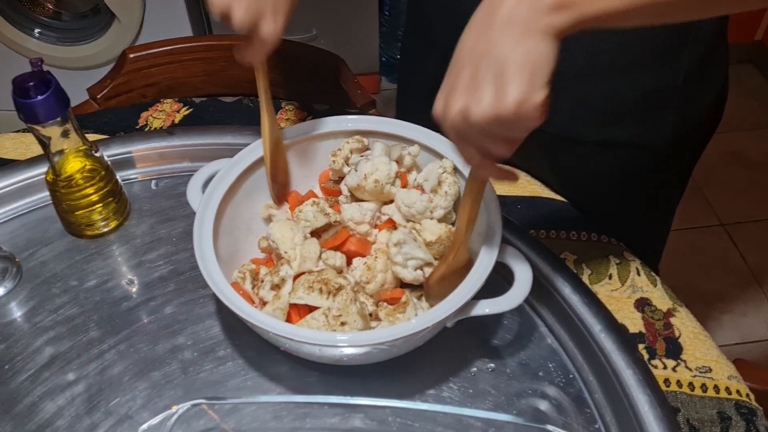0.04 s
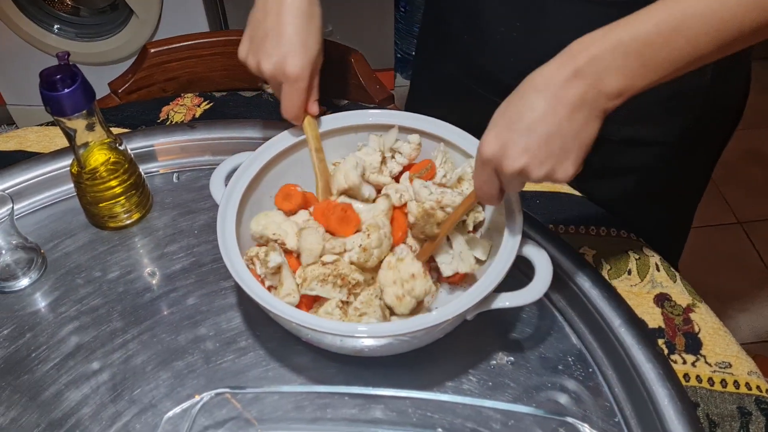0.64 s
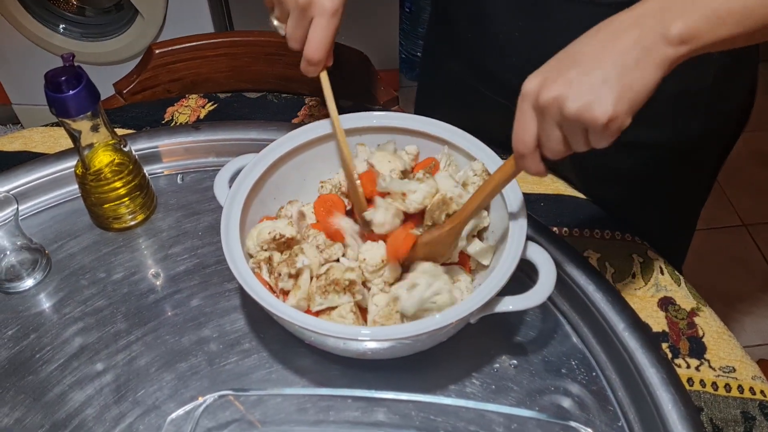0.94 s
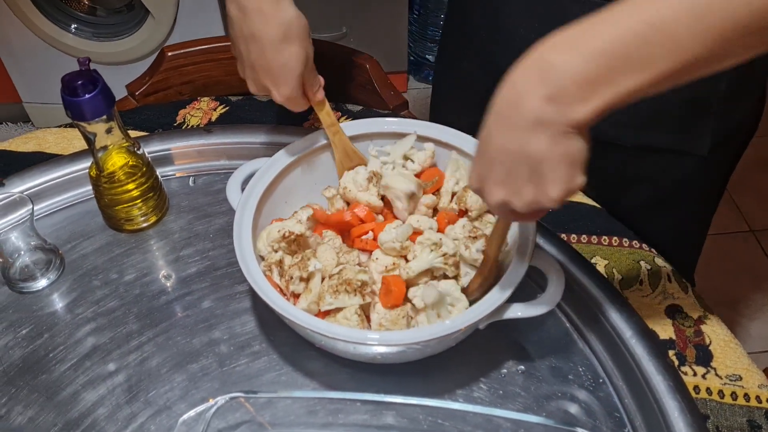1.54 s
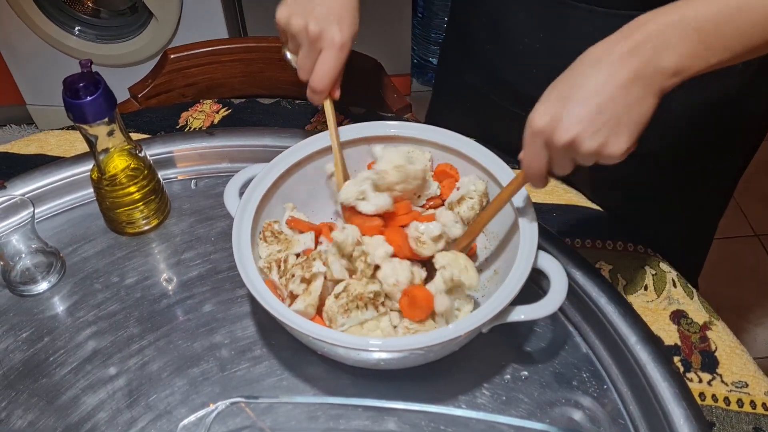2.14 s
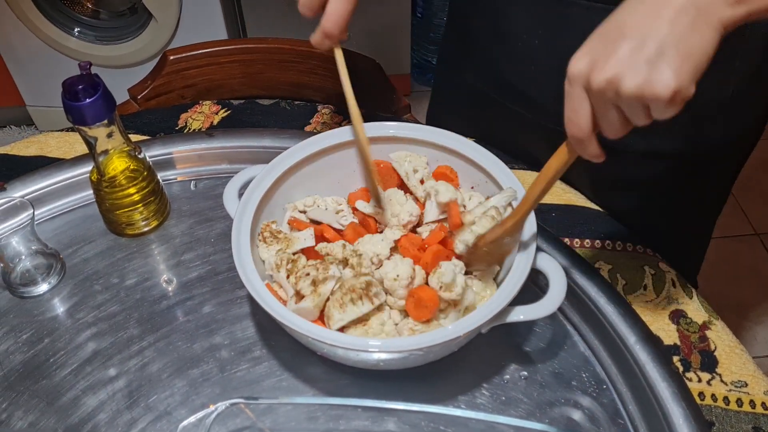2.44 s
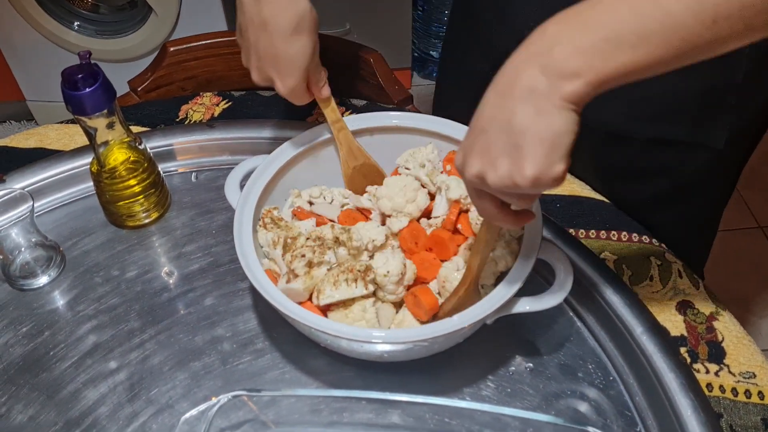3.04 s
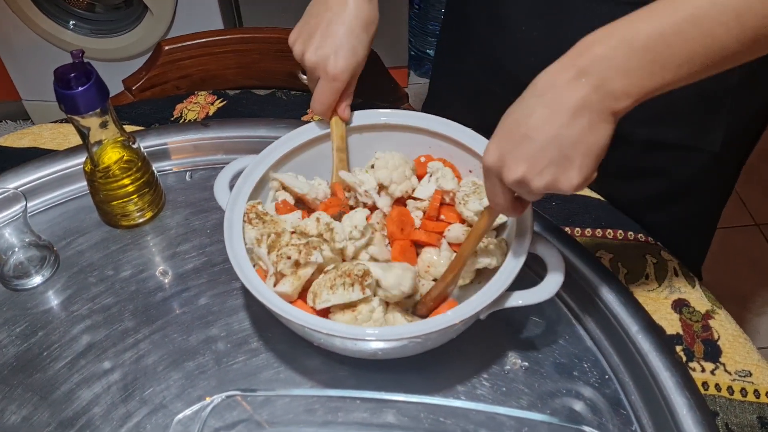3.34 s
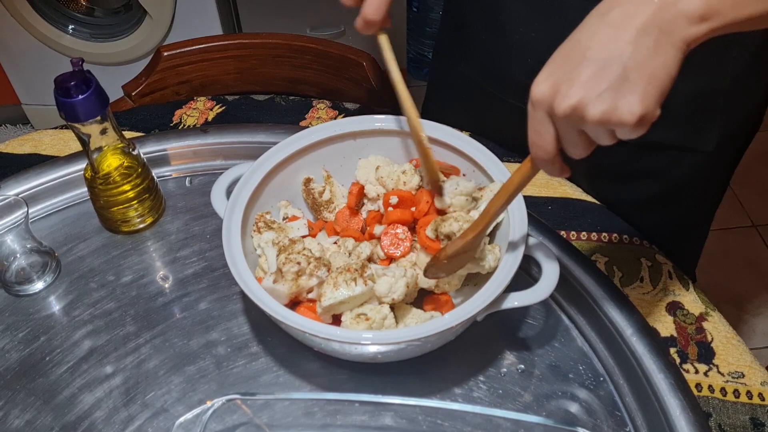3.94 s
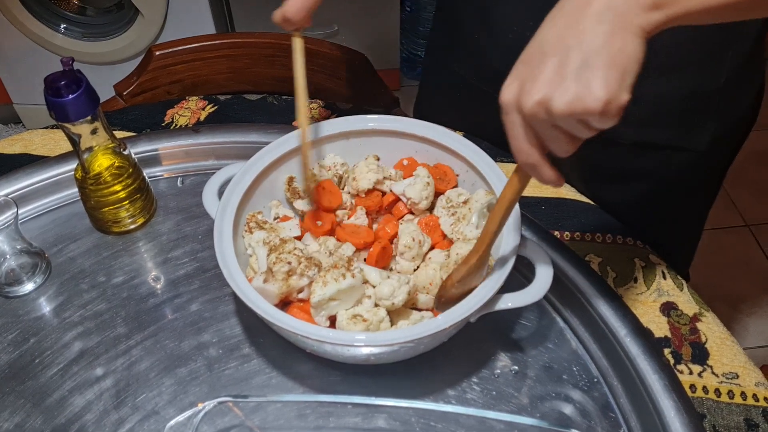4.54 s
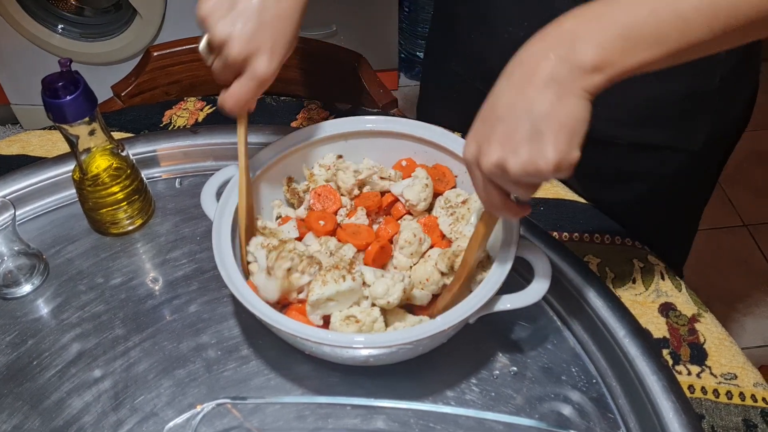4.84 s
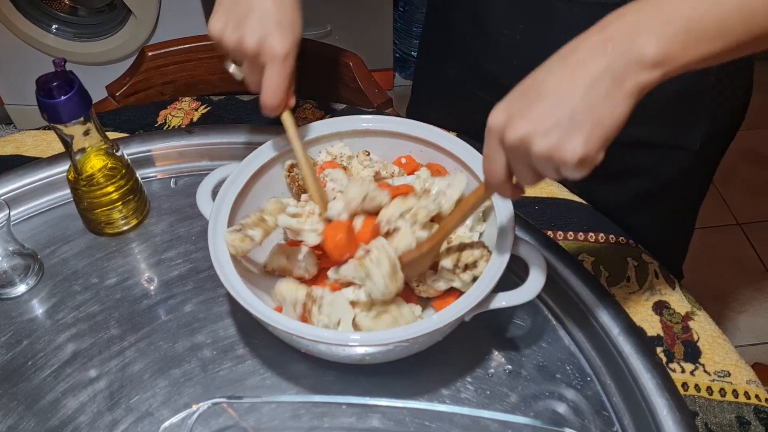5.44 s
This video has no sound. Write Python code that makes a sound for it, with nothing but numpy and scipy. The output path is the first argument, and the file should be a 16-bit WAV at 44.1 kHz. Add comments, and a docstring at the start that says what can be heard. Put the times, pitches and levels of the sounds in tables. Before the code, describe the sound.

Two wooden spoons toss moist vegetables in a plastic bowl, with irregular clacks, short scrapes and soft wet rustling in a small kitchen.

```python
"""Two wooden spoons toss cauliflower and carrot slices in a plastic bowl on a big steel tray.
Each scoop is a clack that rings spoon and bowl, and a stick-slip scrape down the wall.
The moist pieces tick as they unstick, rustle as they rub and tumble softly over one another.
The tray thumps under the knocks and drones as the bowl shifts on it.
A small kitchen answers with a short tail, over low room tone and a faint hum."""
import sys
import numpy as np
from scipy import signal
from scipy.fft import rfft, irfft
from scipy.io import wavfile
from scipy.ndimage import uniform_filter1d

SR = 44100
rng = np.random.default_rng(int(sys.argv[2]) if len(sys.argv) > 2 else 0)


def wav_record(signal):
    """Record a signal, one row per channel, as 16-bit PCM in the file named by sys.argv[1]."""
    frames = np.transpose(np.atleast_2d(signal))
    bounded = np.clip(frames, -1, 1)
    # unit amplitude maps onto the largest positive 16-bit level
    quanta = np.round(bounded * 32767).astype(np.int16)
    wavfile.write(sys.argv[1], SR, quanta)


N = 250870
TIME = np.arange(N) / SR

# spoon hits: (time [s], strength [dB], hardness [0 = cushioned by vegetables, 1 = tip on the bare wall],
# pitch favoured by the struck spot [Hz])
SPOON_HITS = [(.0005, -36, 0.56, 1220), (0.0766, -34, 0.48, 1340), (0.0999, -39, 0.53, 1340),
              (.174, -35.5, 0.76, 1440), (.1827, -47.5, 0.86, 1570), (.351, -42, 0.45, 2000),
              (0.3668, -34, 0.32, 1130), (0.4185, -34, 0.14, 1190), (0.4282, -36.5, 0.031, 1040),
              (0.4948, -30, 0.42, 1410), (.5032, -31, 0.29, 1050), (1.2725, -33, 0.57, 1500),
              (1.3616, -24.5, 0.63, 1430), (1.4772, -49, 0.97, 1090), (1.6725, -47, 0.047, 1050),
              (1.7, -29.5, 0.48, 1210), (1.8594, -42, 0.1, 1010), (2.5469, -39, 0.59, 1470),
              (2.7105, -28, 0.75, 1700), (2.9529, -44.5, .95, 1680), (3.162, -29, 0.22, 1060),
              (3.1925, -32, 0.23, 1250), (3.274, -39.5, .04, 980), (4.583, -37, 0.57, 1370),
              (4.815, -39.5, 0.79, 1960), (5.0524, -54.5, 0.11, 1260), (5.0684, -45, 0.18, 1950)]
# the ring of spoon and bowl: (pitch [Hz], level [dB], t60 [s])
BOWL_MODES = [(690.4, -9.5, 0.067), (760, -9, 0.019), (1043, -11.5, 0.021), (1090, -7, 0.036),
              (1496, -7, 0.02), (1703, 5, 0.0052), (2073, -13.5, 0.019), (3260, -9.5, 0.01),
              (4020, -1.5, 0.0051), (4906, -8, 0.011), (6550, -12, 0.0027), (7440, -8, 0.0085),
              (11800, -27.5, 0.0035)]
# a knock's body, clack, crack, snap and tip registers: (low edge [Hz], high edge [Hz])
REGISTER_BANDS = [(600, 880), (880, 2300), (2600, 5700), (5700, 8300), (8300, 14000)]


def knocks(contact_db=2, detune=0.025, uneven_db=6.5, spot_db=5, spot_octaves=0.17):
    """A brief contact rings spoon and bowl. Returns the close sound and the reverb send."""
    t, out = np.arange(SR // 8) / SR, np.zeros((4, N))
    hz, db, t60 = np.transpose(BOWL_MODES)[:, :, None]
    attack, contact_s = round(.008 * SR), .0009
    for start, strength_db, hardness, spot_hz in SPOON_HITS:
        shift, weight = rng.standard_normal((2, len(hz), 1))  # no two hits ring alike
        favour_db = spot_db * np.exp(-(np.log2(hz / spot_hz) / spot_octaves) ** 2)
        decay = amp(db + favour_db + uneven_db * weight - 60 * t / t60)
        ring = decay * np.sin(2 * np.pi * hz * (1 + detune * shift) * t)
        contact = amp(contact_db) * np.exp(-t / contact_s) * diffuse(len(t), direct=0.17)
        blow = ring.sum(0) + contact
        paths = np.vstack([bounces(blow), blow])  # close pair, send pair
        for band, band_db in zip(REGISTER_BANDS, register_levels(strength_db, hardness)):
            part = signal.sosfilt(signal.butter(3, band, "band", fs=SR, output="sos"), paths)
            attack_rms = np.sqrt(np.mean(part[:, :attack] ** 2, axis=1, keepdims=True))
            add(out, start, amp(band_db) * part / attack_rms)
    return np.split(out, 2)


# a knock's tone, one row per register: (cushioned level [dB], bare-wall level [dB])
REGISTER_BALANCE = [(3.5, -30.5), (1.5, -2.5), (-18.5, 3), (-35.5, 3.5), (-48.5, -1)]


def register_levels(strength_db, hardness):
    """Level in dB of each register: a harder blow trades hollow body for crack."""
    cushioned, bare = np.transpose(REGISTER_BALANCE)
    return strength_db + cushioned + np.clip(hardness, 0, 1) * (bare - cushioned)


# slides down the wall: (start [s], end [s], squeak level [dB], glide from [Hz], to [Hz], rasp level [dB])
SPOON_SLIDES = [(.01, 0.075, -53.5, 1100, 1020, -56.5), (0.086, 0.181, -51.5, 1130, 940, -48),
                (.378, 0.439, -53.5, 1590, 1300, -48), (0.409, 0.47, -44.5, 700, 690, -66),
                (0.516, 0.671, -65, 1020, 750, -56.5), (1.375, 1.42, -72, 1770, 2200, -46.5),
                (1.412, 1.487, -46.5, 1560, 1040, -49), (1.731, 1.81, -62, 1650, 2100, -68),
                (1.777, 1.859, -48, 1020, 940, -51), (2.631, 2.73, -62, 1080, 1100, -58.5),
                (2.728, 2.807, -77, 1650, 1600, -49), (2.787, 2.861, -49.5, 1600, 1350, -46.5),
                (3.207, 3.281, -72, 1780, 1300, -54.5), (3.276, 3.331, -46.5, 960, 1040, -50.5),
                (4.22, 4.346, -73.5, 1300, 2050, -81), (4.618, 4.731, -58.5, 1080, 900, -59.5),
                (5.077, 5.276, -70, 736, 1900, -61.5), (5.162, 5.208, -53.5, 1730, 1560, -68)]
# EQ of wood rasping on plastic: (frequency [Hz], gain [dB])
RASP_EQ = [(300, -5), (700, 2.5), (1100, 1), (2100, 4), (2700, -2), (3600, 1.5), (5100, -2.5), (6500, -7),
           (7800, -7.5), (9500, -16.5), (12300, -11), (16000, -32)]


def scrapes(squeak_trim_db=-1, width_hz=260, waver=0.02, fade_share=0.22):
    """Wood sticks and slips on plastic: a dry rasp, and a squeak that glides as the spoon goes deeper."""
    out = np.zeros((2, N))
    for start, end, squeak_db, first_hz, last_hz, rasp_db in SPOON_SLIDES:
        size = max(round((end - start) * SR), SR // 100)
        slips = grains(size, per_s=2000, spread_db=3) + .45 * diffuse(size, direct=.3)
        hz = np.linspace(first_hz, last_hz, size) * (1 + waver * drift(size, smooth=400))
        squeak = unit_rms(resonate(resonate(slips, hz, width_hz), hz, 2 * width_hz))
        rasp = unit_rms(colour(slips, RASP_EQ))
        sound = amp(squeak_db + squeak_trim_db) * squeak + amp(rasp_db) * rasp
        add(out, start, sound * signal.windows.tukey(size, fade_share))
    return out


# single wet snaps: (time [s], level [dB], pitch of the wet gap [Hz])
WET_SNAPS = [(.1543, -44, 5330), (0.1573, -37.5, 4050), (0.2495, -56, 7470), (1.4941, -40, 6200),
             (1.5554, -53, 7350), (1.5947, -40.5, 4750), (1.653, -42.5, 11800), (1.673, -42, 11700),
             (1.6947, -41.5, 3640), (1.751, -51, 4210), (1.861, -45.5, 4870), (1.9336, -55, 7370),
             (2.375, -71, 5000), (2.498, -59, 11700), (2.9526, -35.5, 5040), (2.9694, -49, 4830),
             (2.9829, -59, 4180), (3.0236, -50, 7300), (3.123, -51.5, 5600), (3.6423, -55.5, 7500),
             (4.2246, -58, 11800), (4.7113, -49.5, 4090), (5.008, -54, 7600), (5.069, -43.5, 8650),
             (5.253, -57.5, 3780)]
# bright EQ of moist vegetables, for ticks and rustle: (frequency [Hz], gain [dB])
MOIST_EQ = [(1200, -7), (2700, -9.5), (4000, -4), (5000, -3), (6200, -7), (7700, -2), (9500, -9.5),
            (12300, -5), (13600, -10), (16000, -19.5)]


def ticks(trim_db=-1, crackle_db=-14, crackle_s=0.0084, gap_db=-2, gap_width_hz=1100):
    """Moist pieces snap and unstick; each snap rings a small wet gap and trails a little crackle."""
    t, out = np.arange(SR // 25) / SR, np.zeros((2, N))
    attack, snap_s = round(.004 * SR), .0011
    for start, db, gap_hz in WET_SNAPS:
        envelope = np.exp(-t / snap_s) + amp(crackle_db) * np.exp(-t / crackle_s)
        burst = colour(diffuse(len(t), direct=0.29) * envelope, MOIST_EQ)
        snap = unit_rms(burst) + amp(gap_db) * unit_rms(resonate(burst, gap_hz, gap_width_hz))
        attack_rms = np.sqrt(np.mean(snap[:, :attack] ** 2))
        add(out, start, amp(db + trim_db) * snap / attack_rms)
    return out


# a spoon shoves the heap: (start [s], length [s], rustle level [dB], tumble level [dB])
HEAP_SHOVES = [(0, .04, -73, -59.5), (.07, 0.11, -53, -60.5), (0.322, 0.37, -66, -61),
               (0.737, 0.082, -62, -63), (0.834, 0.094, -73, -62.5), (0.96, 0.23, -76, -72),
               (1.383, 0.24, -58, -65), (1.654, 0.072, -61, -53.5), (1.79, 0.098, -59.5, -55),
               (1.929, 0.052, -58, -54.5), (2.214, 0.25, -71, -65), (2.685, 0.14, -52, -67),
               (2.958, .18, -61, -56.5), (3.18, 0.19, -60, -61), (3.464, 0.24, -72.5, -80),
               (3.798, 0.076, -73, -62.5), (4.126, .1, -76.5, -66), (4.216, 0.086, -62, -61),
               (4.427, 0.052, -62.5, -65), (4.805, 0.19, -64, -61.5), (4.986, .12, -60, -54.5),
               (5.11, 0.098, -64, -62.5), (5.298, .05, -63.5, -61.5), (5.38, 0.26, -75, -66)]


def shoving(rise_s=0.013, stop_t60=0.13, settle_db=-14, settle_t60=1.5, roll_t60=0.38, rest_db=-62.5):
    """Rustle and tumble envelopes: rubbing stops soon after the spoon, rolling never quite stops."""
    rustles, tumbles = [], []
    for start, length, rustle_db, tumble_db in HEAP_SHOVES:
        push = stroke(start, length, rise_s, stop_t60)
        settle = amp(settle_db) * stroke(start, length, rise_s, settle_t60)  # a few slip into place
        rustles.append(amp(rustle_db) * np.maximum(push, settle))
        tumbles.append(amp(tumble_db) * stroke(start, length, rise_s, roll_t60))
    return power_sum(rustles), np.hypot(power_sum(tumbles), amp(rest_db))


def heap(tumble_trim_db=-3, clump_db=2.0, squelch_db=-5, gaps_per_s=60):
    """Pieces rub with a clumpy, moist crackle, squelch in small gaps and roll softly on one another."""
    clumps = amp(clump_db * np.clip(drift(N, smooth=700), -2, 2))
    crackle = clumps * (grains(N, per_s=2000, spread_db=4) + .5 * diffuse(N))
    # each wet gap between pieces has its own pitch and lasts a moment
    pitches_hz = 3500 * (8200 / 3500) ** rng.random(N)
    gap_index = np.cumsum(rng.random(N) < gaps_per_s / SR)
    squelch = unit_rms(resonate(crackle, pitches_hz[gap_index], width_hz=500))
    moist = unit_rms(unit_rms(colour(crackle, MOIST_EQ)) + amp(squelch_db) * squelch)
    rustle_gain, tumble_gain = shoving()
    return rustle_gain * moist + amp(tumble_trim_db) * tumble_gain * rolling()


# dull EQ of tumbling pieces: (frequency [Hz], gain [dB])
TUMBLE_EQ = [(60, -9), (110, -6), (290, 0), (430, -8), (850, -8.5), (1500, -12), (2500, -32), (5000, -47)]


def rolling():
    """Pieces roll over one another in a soft, low patter."""
    bumps = grains(N, per_s=400, spread_db=1.5) + diffuse(N)
    return unit_rms(colour(bumps, TUMBLE_EQ))


# the bowl is dragged over the tray: (start [s], length [s], level [dB])
BOWL_DRAGS = [(0.45, 0.1, -57.5), (1.026, 0.13, -60), (1.57, 0.47, -54), (2.054, 0.35, -54),
              (2.69, 0.3, -54), (3.11, 0.11, -47), (4.898, .17, -65)]


def tray_drone(hz=67, wander_hz=2.3, overtone_db=-15, rise_s=0.094, t60=0.64, rest_db=-75, trim_db=-1):
    """The steel drones as the bowl's foot grips it unevenly; stirring keeps a trace of it going."""
    phase = 2 * np.pi * np.cumsum(hz + wander_hz * drift(N, smooth=5000)) / SR
    tone = unit_rms(np.sin(phase) + amp(overtone_db) * np.sin(3 * phase))
    drags = power_sum(amp(db) * stroke(start, length, rise_s, t60) for start, length, db in BOWL_DRAGS)
    grip_db = 2 * drift(N, smooth=4000)
    return amp(trim_db + grip_db) * np.hypot(drags, amp(rest_db)) * tone


# the tray's low partials, detuned afresh on each hit: (nominal pitch [Hz], level [dB])
THUD_MODES = [(50, 1), (100, -1.5), (145, -5), (215, 1), (290, 2), (390, 2)]


def tray_thuds(thud_db=-17, t60=0.33):
    """Each knock thumps the tray: the more hollow body it has, the heavier the thud."""
    t, out = np.arange(SR // 3) / SR, np.zeros((2, N))
    for start, strength_db, hardness, _ in SPOON_HITS:
        body_db = register_levels(strength_db, hardness)[0]
        thud = sum(amp(db) * np.sin(2 * np.pi * hz * rng.uniform(0.84, 1.5) * t) for hz, db in THUD_MODES)
        add(out, start, amp(body_db + thud_db - 60 * t / t60) * np.array([thud, thud]))
    return out


# the kitchen's reverb: (frequency [Hz], t60 [s], level [dB])
KITCHEN_REVERB = [(246, 1, -1), (734, 0.35, -7.5), (1600, 0.5, -4.5), (4480, 0.27, -1.5),
                  (11230, 0.32, -7.5)]


def kitchen(send, build_s=0.0034, tails=3, changes_per_s=5):
    """Close hard surfaces ring on; tails take turns so that knocks do not all ring at the same pitches."""
    decay_curve = [(hz, t60) for hz, t60, _ in KITCHEN_REVERB]
    tail_eq = [(hz, db) for hz, _, db in KITCHEN_REVERB]
    turn = np.floor(TIME * changes_per_s) % tails
    out = np.zeros((2, N))
    for k in range(tails):
        hz, t, spectrum = signal.stft(diffuse(SR // 2), SR, nperseg=256)
        t60 = curve_at(decay_curve, hz)[:, None]
        tail = signal.istft(spectrum * amp(-60 * t / t60), SR, nperseg=256)[1]
        tail *= 1 - np.exp(-(np.arange(tail.shape[1]) / SR / build_s) ** 2)
        tail = colour(tail / np.linalg.norm(tail[0]), tail_eq)
        crossfade = np.sqrt(abs(uniform_filter1d(1.0 * (turn == k), size=4000)))
        out += signal.fftconvolve(send * crossfade, tail, axes=1)[:, :N]
    return out


# EQ of the room tone: (frequency [Hz], gain [dB])
ROOM_TONE_EQ = [(15, -41.5), (25, -25), (285, -2.5), (463, -29), (591, -6.5), (659, -9), (818, -4),
                (1020, -3), (1130, -11), (1400, -17), (2690, -47), (3720, -46), (5880, -32.5),
                (6740, -30.5), (16000, -42.5)]


def room_tone(air_db=-64, hum_db=-68):
    """A bed of low, steady noise with a faint wavering hum."""
    narrow_noise = resonate(diffuse(N), hz=145.8, width_hz=8.5)
    hum = unit_rms(resonate(narrow_noise, hz=133, width_hz=41.2))
    air = unit_rms(colour(diffuse(N, direct=0.067), ROOM_TONE_EQ))
    return amp(air_db) * air + amp(hum_db) * hum


def bounces(x, gain=0.51, spread_s=.0032, count=8):
    """The direct sound, a little earlier on the left, and quick reflections off bowl and tray."""
    taps = np.zeros((2, SR // 50))
    taps[0, 0] = taps[1, 4] = 1
    for when, side, polarity in rng.random((count, 3)):
        left = 12 + int(when * spread_s * SR)
        right = left + int(20 * side - 7)
        taps[[0, 1], [left, right]] += gain * (1 - when / 2) * np.sign(polarity - .5)
    return signal.fftconvolve(x, taps, axes=1)[:, :x.shape[1]]


def grains(size, per_s, spread_db):
    """Random tiny clicks, a few much larger than the rest, each from its own direction."""
    left = np.flatnonzero(rng.random(size) < per_s / SR)
    height = amp(spread_db * np.minimum(rng.exponential(1, len(left)), 4))
    height *= rng.choice([-1, 1], len(left))
    right = np.minimum(left + rng.integers(-4, 12, len(left)), size - 1)
    out = np.zeros((2, size))
    out[0, left] = out[1, right] = height
    return unit_rms(out)


def diffuse(size, direct=0, mic_gap_m=0.2):
    """Stereo noise: alike in the bass, unrelated in the treble but for a direct share."""
    left, other = rfft(rng.standard_normal((2, size)))
    coherence = np.sinc(2 * np.fft.rfftfreq(size, 1 / SR) * mic_gap_m / 343)
    coherence = np.clip(coherence + direct * (1 - coherence), -1, 1)
    return irfft([left, coherence * left + np.sqrt(1 - coherence ** 2) * other], size)


def colour(x, eq):
    """Applies a minimum-phase EQ, so that attacks stay sharp."""
    log_gain = np.log(amp(curve_at(eq, abs(np.fft.fftfreq(4096, 1 / SR)))))
    taps = np.fft.ifft(np.exp(np.conj(signal.hilbert(log_gain)))).real
    return signal.fftconvolve(x, taps[None, :len(taps) // 2], axes=1)[:, :x.shape[1]]


def resonate(x, hz, width_hz):
    """A resonance of gain 1 at a steady or moving pitch."""
    carrier = np.exp(2j * np.pi * np.cumsum(hz * np.ones(x.shape[-1])) / SR)
    pole = np.exp(-np.pi * width_hz / SR)
    return 2 * (carrier * signal.lfilter([1 - pole], [1, -pole], x / carrier)).real


def stroke(start, length, rise_s, t60):
    """Envelope of one movement: it builds, holds and dies away."""
    t = TIME - start
    return np.clip(t / rise_s, 0, 1) * amp(-60 * np.maximum(t - length, 0) / t60)


def drift(size, smooth):
    """Random modulation of rms 1, averaged over `smooth` samples."""
    return unit_rms(uniform_filter1d(rng.standard_normal(size), size=smooth))


def power_sum(gains):
    """Unrelated movements sum in power."""
    return np.sqrt(sum(gain ** 2 for gain in gains))


def curve_at(points, hz):
    """Joins (frequency [Hz], value) points on a log-frequency axis."""
    point_hz, value = np.transpose(points)
    return np.interp(np.log(hz + 1), np.log(point_hz + 1), value)


def add(mix, start_s, sound):
    """Mixes a sound in at its cue."""
    part = mix[:, max(0, round(start_s * SR)):][:, :sound.shape[1]]
    part += sound[:, :part.shape[1]]


def amp(db):
    """Decibels to gain."""
    return 10 ** (np.asarray(db) / 20)


def unit_rms(x):
    """Scales x to an rms of 1."""
    return x / np.sqrt(np.mean(x ** 2) + 1e-20)


def scene(send_db=-1):
    """Spoons and vegetables up front with kitchen reverb, over the tray and the room tone."""
    close_knocks, knock_send = knocks()
    stirring = scrapes() + ticks() + heap()
    reverb = kitchen(amp(send_db) * (knock_send + stirring))
    return close_knocks + stirring + reverb + tray_drone() + tray_thuds() + room_tone()


def record(dry, lag_radians=0.47, lag_corner_hz=120, low_cut_hz=30, high_cut_hz=16150):
    """The right channel lags in the deep bass; then a low cut and a steep high cut."""
    lag = lag_radians / (1 + (np.fft.rfftfreq(N, 1 / SR) / lag_corner_hz) ** 2)
    pair = np.array([dry[0], irfft(rfft(dry[1]) * np.exp(-1j * lag), N)])
    low_cut = signal.butter(3, low_cut_hz, "high", fs=SR, output="sos")
    high_cut = signal.firwin(511, high_cut_hz, window=("kaiser", 9), fs=SR)
    return signal.oaconvolve(signal.sosfilt(low_cut, pair), high_cut[None], "same")


dry = scene()
out = record(dry)
wav_record(out)
```